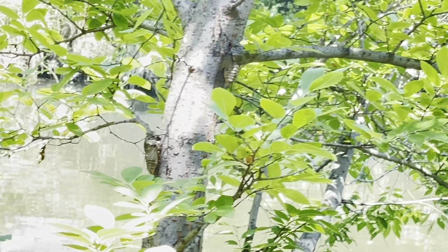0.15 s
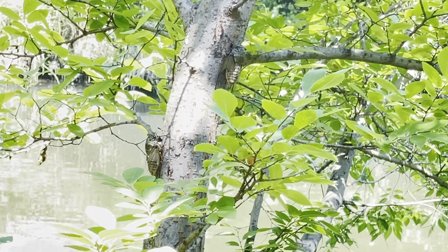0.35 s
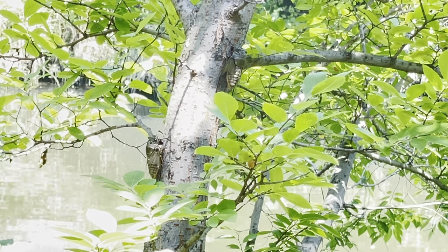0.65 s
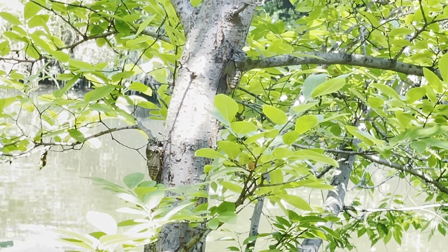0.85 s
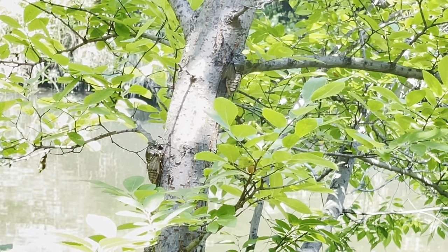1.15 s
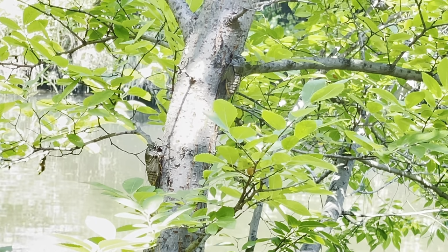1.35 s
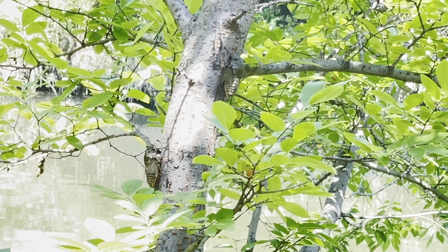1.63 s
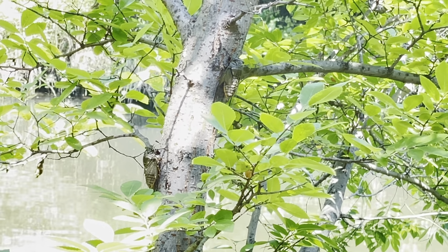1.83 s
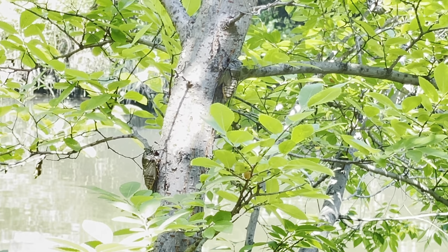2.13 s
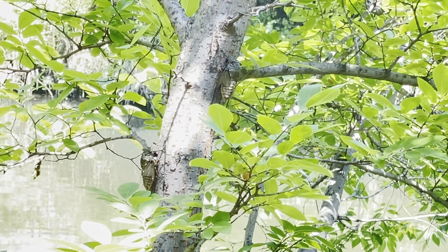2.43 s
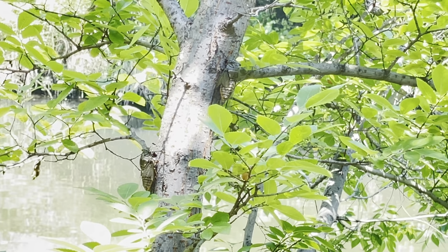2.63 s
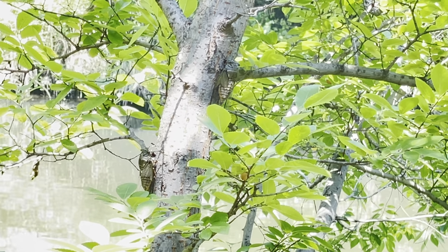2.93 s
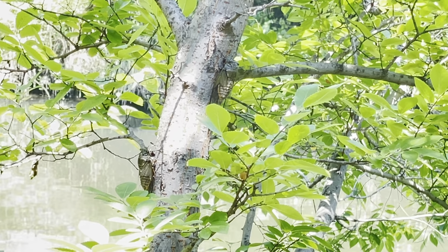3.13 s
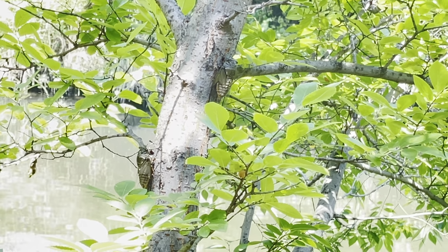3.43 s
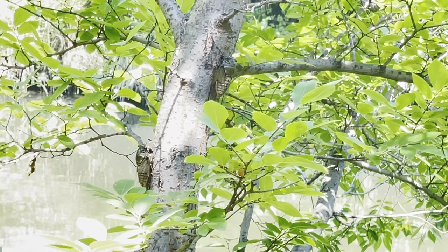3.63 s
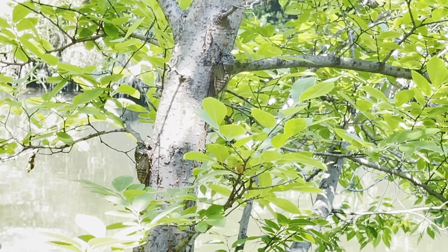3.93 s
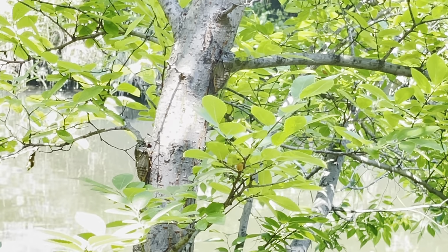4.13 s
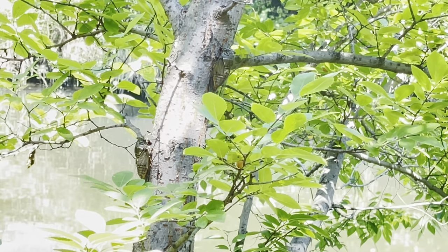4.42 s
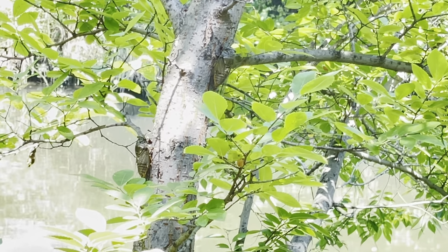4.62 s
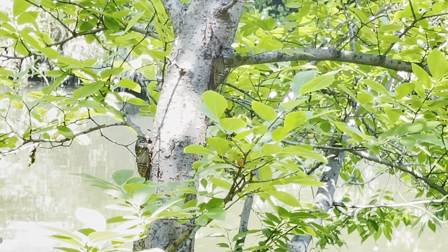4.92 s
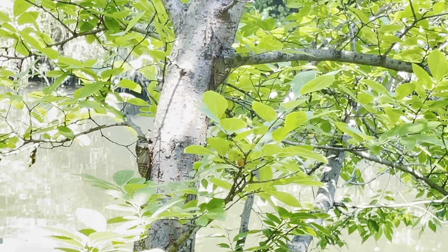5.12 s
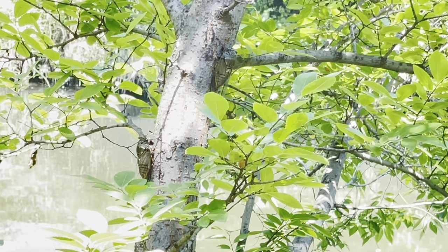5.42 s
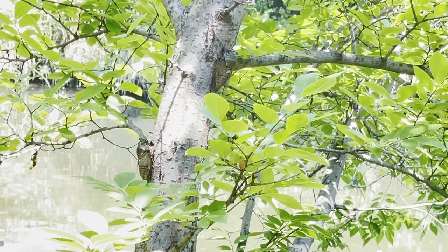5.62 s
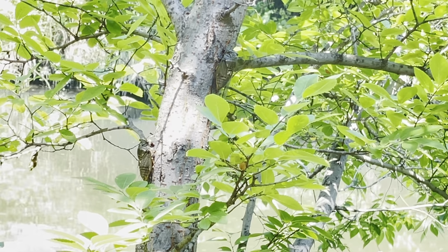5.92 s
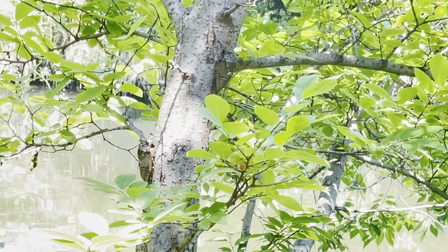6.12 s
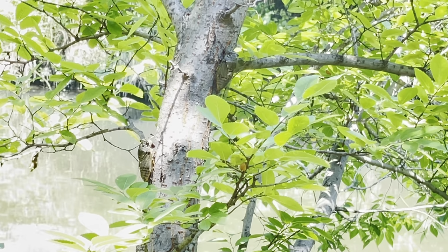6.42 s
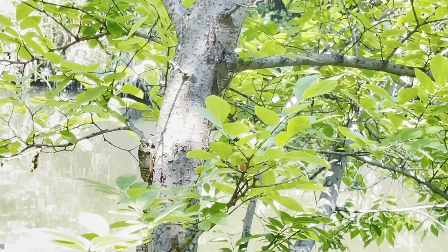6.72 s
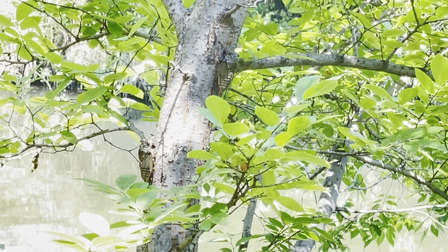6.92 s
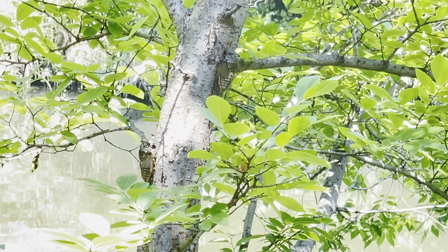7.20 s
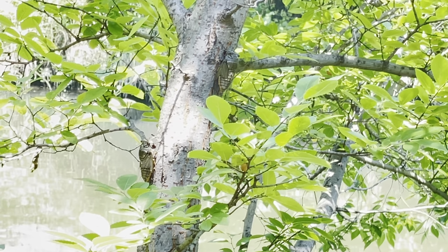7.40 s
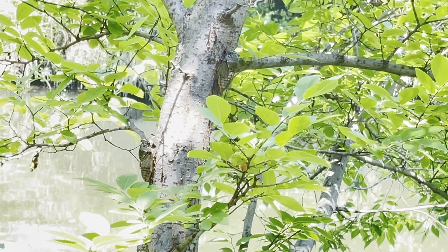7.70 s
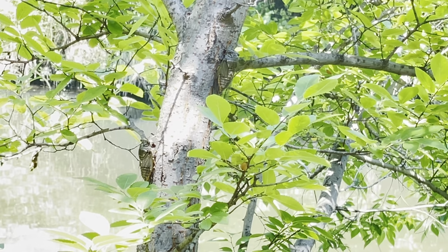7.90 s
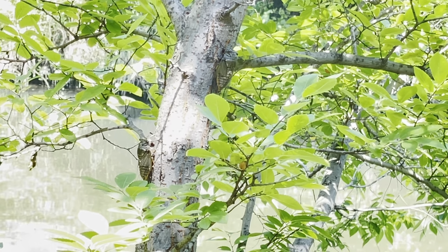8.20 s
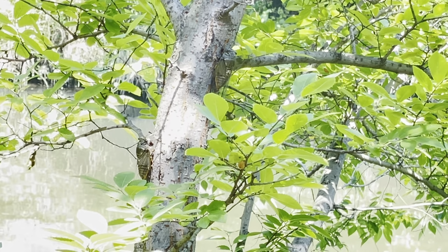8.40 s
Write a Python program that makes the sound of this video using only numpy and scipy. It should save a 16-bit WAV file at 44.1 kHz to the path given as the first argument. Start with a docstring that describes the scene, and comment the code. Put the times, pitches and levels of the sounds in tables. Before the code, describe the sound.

A cicada buzzes loudly and continuously on a nearby trunk, its harsh rapid rattle dulling midway, tightening again, then fading slightly over faint town rumble.

```python
"""A cicada buzzes on a tree trunk by a pond, close to a phone. Some 43 to 49 times a second a muscle stroke buckles
the ribs of its tymbals in a quick run of clicks that ring the hollow abdomen; midway the body slackens, then tenses again.
Leaves and branches scatter the song as noise tails and short echoes. Under it lie a town's rumble, made of filtered
noise, and, near the end, a distant engine gathering speed, made of wavering exhaust harmonics."""
import sys
import numpy as np
from scipy import signal
from scipy.fft import rfft, irfft, next_fast_len
from scipy.io import wavfile
from scipy.ndimage import uniform_filter1d

SR = 44100
rng = np.random.default_rng(int(sys.argv[2]) if len(sys.argv) > 2 else 0)


def digitize_waveform(pressure):
    """Quantize a signal to 16-bit integers and store it at the path in sys.argv[1].

    Rows of a 2-D input are taken as channels; values are limited to [-1, 1].
    """
    field = np.atleast_2d(pressure).T
    bounded = np.clip(field, -1, 1)
    quanta = np.round(bounded * 32767).astype(np.int16)
    wavfile.write(sys.argv[1], SR, quanta)


N = 377055

TIME = np.arange(N) / SR
# filters work on a padded length, so that their tails do not wrap round
PADDED = 2 * next_fast_len(N // 2 + 8192, real=True)
FREQ = np.maximum(np.fft.rfftfreq(PADDED, 1 / SR), 1)
TOP_HZ = 15500


def undb(db):
    """Decibels to gain."""
    return 10 ** (np.asarray(db) / 20)


def unit(x):
    """Scale to rms 1."""
    return x / np.sqrt(np.mean(x ** 2))


def across(table):
    """A (Hz, value) table at every frequency, joined on a log axis."""
    hz, value = np.transpose(table)
    return np.interp(np.log(FREQ), np.log(hz), value)


def filtered(x, response):
    """Pass a sound through a frequency response."""
    return irfft(rfft(x, PADDED) * response)[..., :N]


def walk(rate_hz):
    """Slow random drift with a spread near 1, heading for a new value rate_hz times a second."""
    points = rng.standard_normal(1024)
    return np.interp(TIME * rate_hz, np.arange(len(points)), points)


def smear(clicks, decay_s):
    """Noise that follows each click and dies away."""
    power = signal.lfilter([1], [1, -np.exp(-2 / (decay_s * SR))], clicks ** 2)
    return unit(np.sqrt(power) * rng.standard_normal(N))


def cicada(near_lead_s=.001, far_lead_s=.0014, far_share=.55, far_hz=6000):
    """Two tymbals drive the body, the far one mostly in the treble; returns the sound from the trunk and from all round."""
    stroke_hz = stroke_rate()
    tension, loud_db, treble_db, fill, hitch = posture()
    near = tymbal(stroke_hz, tension, fill, hitch, near_lead_s)
    far = tymbal(stroke_hz, tension, fill, hitch, far_lead_s)
    # share of the power that the far tymbal gives at each frequency
    share = far_share / (1 + (far_hz / FREQ) ** 6)
    drive = unit(filtered(near, np.sqrt(1 - share)) + filtered(far, np.sqrt(share)))
    return abdomen(leaves(drive), tension, treble_db) * undb(loud_db)


def stroke_rate(flag_hz=3.85, waver_hz=.15):
    """Strokes per second: the muscle starts each bout fresh, sags through it and flags at its end."""
    # bouts of the muscle: start_s, end_s, fresh_rate_hz (before sag and flagging), sag_hz_per_s, flag_time_s
    bouts = np.array([(0, 3.8, 47.96, .1, 1.08), (3.8, 8.55, 49.19, .53, .92)])
    start_s, end_s, fresh_hz, sag, flag_s = bouts[np.searchsorted(bouts[1:, 0], TIME)].T
    flagging = flag_hz * np.exp((TIME - end_s) / flag_s)
    return fresh_hz - sag * (TIME - start_s) - flagging + waver_hz * walk(14)


def posture(shift_s=.3, tiring_db_per_s=.3836, fade_at_s=8.2, fade_db_per_s=5,
            swing_hz=1.92, swing_db=6, steady_at_s=2.7):
    """Tension, loudness, treble, fill and hitch: each posture eases into the next while the song slowly tires."""
    # postures the abdomen takes and holds: start_s, tension (0-1), level_db (before tiring and fade),
    # treble_db, fill (even click size that fills in the throb, before its swing), hitch in mid-stroke (0-1)
    postures = np.array([(0, 1, -23, -.3, 1.7, 0.1), (2.7, 1, -22.5, -0.5, 1.3, 0),
                         (3.7, 0.8, -24, -1, 2.4, 0), (4.22, 0, -26, -1, 1.5, 0.7),
                         (5.2, 0.01, -25.5, 0, 1.1, 0.55), (6.7, 0.94, -22, -1.6, 0.97, 0.2),
                         (7.549, 0.96, -23.5, -3.5, 0.18, 0.1), (8.02, 0.86, -23.5, -3.5, 0.86, 0.2),
                         (8.35, .75, -24.4, -3.5, 0.36, 0.9)])
    held = postures[np.searchsorted(postures[1:, 0], TIME)].T
    _, tension, level_db, treble_db, fill, hitch = uniform_filter1d(held, int(shift_s * SR), mode="nearest")
    tiring_db = tiring_db_per_s * TIME
    fade_db = fade_db_per_s * np.maximum(TIME - fade_at_s, 0)
    # early in the song the throb comes and goes
    fill_swing_db = swing_db * np.sin(2 * np.pi * swing_hz * TIME) * (TIME < steady_at_s)
    return tension, level_db - tiring_db - fade_db, treble_db, fill * undb(fill_swing_db), hitch


def tymbal(stroke_hz, tension, fill, hitch, lead_s, spread_s=.0023, crackle_s=.0006, crackle_db=-8):
    """Bending waves carry the treble of a click out first, drawing it into a chirp; the membrane crackles after it."""
    clicks = rib_clicks(stroke_hz, tension, fill, hitch, lead_s)
    drive = unit(clicks) + undb(crackle_db) * smear(clicks, crackle_s)
    delay_s = spread_s * (.5 - FREQ / TOP_HZ)
    # phase is the running sum of delay over frequency
    chirp = np.exp(-2j * np.pi * np.cumsum(delay_s) * SR / PADDED)
    return unit(filtered(drive, chirp))


def rib_clicks(stroke_hz, tension, fill, hitch, lead_s, count=17, first_stroke=.31,
               tense_share=.059, slack_share=.053, offset_s=.00009, jitter_s=.00005, slip_s=.00011,
               build_db=5.6, pull_ribs=6.4, volleys_per_stroke=6, volley_depth=.5, hitch_ribs=1.9,
               uneven_db=1.3, chance_db=.5):
    """Each stroke buckles uneven ribs and stops short; slack ribs go in volleys, and a hitch splits the stroke."""
    # first_stroke: the part of it that is already over at the start
    turns = first_stroke + np.cumsum(stroke_hz) / SR
    stroke = np.arange(1, int(turns[-1]) + 2)[:, None]
    late, strong = rib_habits(len(stroke), count)
    chance = rng.standard_normal((len(stroke), 3, count))
    firm, even, split = (np.interp(stroke, turns, control) for control in (tension, fill, hitch))

    # place of each rib, as a share of a stroke from its middle
    rib = np.arange(count) - (count - 1) / 2
    place = rib * (slack_share + (tense_share - slack_share) * firm)
    when = np.interp(stroke + place, turns, TIME, left=-1, right=TIME[-1] + 1)
    # a whole stroke slips in time; each rib is late by habit and by chance
    when = when + slip_s * chance[:, 0, :1] + offset_s * late + jitter_s * chance[:, 1]

    # the clicks build up through the pull (build_db per stroke) and stop quickly when the muscle lets go
    arch = undb(build_db * place) * np.exp(-np.abs(rib / pull_ribs) ** 5)
    volleys = 1 - volley_depth * (1 - firm) * np.cos(2 * np.pi * volleys_per_stroke * place)
    halves = 1 - split * np.exp(-(rib / hitch_ribs) ** 4)
    size = unit(arch) * volleys * halves + even
    size = size * undb(uneven_db * strong + chance_db * chance[:, 2])
    # every stroke spends the same energy
    size = size / np.linalg.norm(size, axis=1, keepdims=True)

    sample = np.floor((when - lead_s) * SR).astype(int)
    inside = (sample >= 0) & (sample < N)
    return np.bincount(sample[inside], size[inside], N)


def rib_habits(strokes, ribs, memory_strokes=14):
    """How late and how strongly each rib buckles: no two are alike, and the pattern changes slowly over the strokes."""
    chance = rng.standard_normal((strokes, ribs, 2))
    habits = unit(uniform_filter1d(chance, memory_strokes, axis=0, mode="wrap"))
    return np.moveaxis(habits, -1, 0)


def abdomen(drive, tension, treble_db, treble_hz=8500, tires_from_s=1.2, tired_at_s=7.4):
    """The hollow body rings in its present posture; tense, it passes from fresh to lower, tired resonances."""
    # broad colour of the tense and of the slack body: pitch_hz, level_db
    tense_colour = [(1500, -49), (2050, -38), (2700, -24.5), (3020, -15.3), (3300, -6), (3900, -3),
                    (4700, -.5), (6000, 0.9), (7100, -0.16), (7550, -1), (8300, -6.5), (9300, -6),
                    (9900, -5.5), (12200, -8), (13200, -16), (14200, -24), (15500, -40)]
    slack_colour = [(1500, -52), (2100, -46), (2700, -29.5), (3000, -19.5), (3300, -12), (3900, -7.5),
                    (4700, -7.5), (6000, -4), (7100, -2.5), (7550, -5), (8300, -11), (9300, -10),
                    (10200, -10.5), (12200, -14.5), (13200, -18), (14200, -26), (15500, -41)]
    # resonances that stand out of it, for the fresh tense, tired tense and slack body: pitch_hz, width_hz, lift_db
    fresh_modes = [(2460, 70, 2), (3520, 290, 6.8), (4365, 180, 7.6), (4850, 300, 2.8), (5400, 80, 5),
                   (5545, 110, 5.2), (6250, 110, 2.2), (6580, 70, 3.2), (6910, 80, 3), (7900, 300, 3.3),
                   (9050, 150, 2), (12150, 130, 3.4)]
    tired_modes = [(2250, 130, 5.5), (2470, 110, 8), (2850, 200, 4.8), (3330, 380, 5.5), (3680, 200, 2.2),
                   (4290, 220, 6.6), (4860, 200, 2.5), (5400, 100, 4), (5520, 120, 3.5), (6220, 130, 2.2),
                   (6920, 90, 2.5), (7250, 120, 2), (10950, 500, 2.2), (13700, 900, 3.5)]
    slack_modes = [(3550, 290, 5.6), (4540, 300, 5.2), (4830, 280, 6.7), (5150, 60, 4.8), (5400, 260, 5.4),
                   (5860, 140, 5.8), (6620, 130, 4.4), (6910, 70, 3), (7950, 300, 3.2), (9050, 200, 3),
                   (11120, 330, 4.9), (11600, 110, 4), (12150, 220, 5.4), (12660, 200, 5.8)]
    fresh = unit(filtered(drive, ringing(tense_colour, fresh_modes)))
    tired = unit(filtered(drive, ringing(tense_colour, tired_modes)))
    slack = unit(filtered(drive, ringing(slack_colour, slack_modes)))
    tiredness = np.interp(TIME, [tires_from_s, tired_at_s], [0, 1])
    tense = fresh + (tired - fresh) * tiredness
    song = tension * tense + (1 - tension) * slack
    treble = filtered(song, .5 + .5 * np.tanh((FREQ - treble_hz) / 1000))
    return song + (undb(treble_db) - 1) * treble


def ringing(colour, modes):
    """Causal (minimum-phase) response of a body with a broad colour and a few resonances."""
    db = across(colour)
    for hz, width_hz, lift_db in modes:
        db = db + lift_db / (1 + (2 * (FREQ - hz) / width_hz) ** 2)
    # folding the cepstrum onto positive time makes the ringing follow the click
    cepstrum = irfft(np.log(undb(db)))
    return np.exp(rfft(2 * cepstrum[:PADDED // 2], PADDED) - cepstrum[0])


def leaves(drive, decay_s=.075, scatter_hz=8000, most=.53, around_db=-14.3):
    """Moving leaves scatter the song into noise tails, the more so the shorter the wave; returns front and around."""
    scattered = most * FREQ ** 4 / (FREQ ** 4 + scatter_hz ** 4)
    direct = filtered(drive, np.sqrt(1 - scattered))
    front = direct + filtered(smear(drive, decay_s), np.sqrt(scattered))
    around = undb(around_db) * filtered(smear(drive, decay_s), np.sqrt(.5 + 2 * scattered))
    return np.array([front, around])


def trees(x, t60_s=.26, first_s=.000685):
    """Short fixed echoes from the trunk and the nearest branches: a decaying burst of noise as impulse response."""
    t = TIME[:SR // 4]
    # a fall of 60 dB in t60_s
    decay = np.exp(-np.log(1000) * t / t60_s)
    echoes = rng.standard_normal(len(t)) * decay * (t > first_s)
    return signal.fftconvolve(x, echoes / np.linalg.norm(echoes))[:N]


def engine(cruise_hz=40.8, fast_hz=45.9, speed_up_at_s=7.62, speed_up_s=.4,
           scatter=.35, fading_hz=9, waver=.004):
    """Far exhaust tones that climb once in pitch; each comes by several paths through the trees, so its level wavers."""
    # exhaust tones: multiple of the firing rate, level_db (relative)
    exhaust = [(2, -7), (3, -13), (4, -12), (5, -8), (6, 0), (7, -3.5), (8, -14), (9, -20)]
    # it comes into earshot, sinks briefly and returns: time_s, level_db
    engine_pass = [(0, -110), (6.4, -70), (7.0, -60), (7.25, -52), (7.5, -50), (7.77, -48.3), (7.88, -52.5),
                   (8.05, -53.5), (8.35, -51), (8.55, -52.5)]
    climb = .5 + .5 * np.tanh((TIME - speed_up_at_s) / speed_up_s)
    firing_hz = cruise_hz + (fast_hz - cruise_hz) * climb
    angle = 2 * np.pi * np.cumsum(firing_hz * (1 + waver * walk(20))) / SR
    tones = 0
    for multiple, level_db in exhaust:
        # strength and phase of the tone, drifting by chance
        paths = 1 + scatter * (walk(fading_hz) + 1j * walk(fading_hz))
        tones = tones + undb(level_db) * np.imag(paths * np.exp(1j * multiple * angle))
    return unit(tones) * undb(np.interp(TIME, *np.transpose(engine_pass)))


def town(level_db=-49, side_db=-8.7, left_db=.55, wide_hz=200, narrow_hz=1100, rise_db=2.5):
    """Low rumble of filtered noise that slowly grows; its bass is nearly alike at both ports."""
    # colour of the rumble: pitch_hz, level_db (relative, per Hz)
    rumble = [(12, -53), (20, -26), (33, -6.5), (47, 1), (70, -3.5), (93, 0.5), (104, -7.5), (119, -7),
              (130, -12), (160, -11), (212, -14.5), (270, -14.5), (381, -19.5), (594, -21.5), (707, -23.5),
              (1080, -27), (2000, -29.5), (2600, -25), (4400, -120)]
    mid, side = filtered(rng.standard_normal((2, N)), undb(across(rumble)))
    # the side noise is band-limited: it fades in above wide_hz and rolls off past narrow_hz
    side_band = FREQ / np.hypot(FREQ, wide_hz) / np.hypot(1, (FREQ / narrow_hz) ** 2)
    side = filtered(side, undb(side_db) * side_band)
    pair = unit(np.array([(mid + side) * undb(left_db), (mid - side) * undb(-left_db)]))
    swell_db = .4 * walk(4)
    growth_db = rise_db * (TIME / TIME[-1] - .5)
    return pair * undb(level_db + swell_db + growth_db)


def scene(song_db=-2.5, echo_db=-17):
    """The song reaches the two ports at different phases; the town and the engine lie under it."""
    # how far the left port leads the right for the song: pitch_hz, lead_radians
    port_phase = [(20, 0), (3020, 0), (3170, .62), (5330, .62), (5500, -.7), (5750, -1.6), (6600, -.78),
                  (7200, -1.3), (7450, -2.3), (8080, -2.2), (8320, -3.05), (9250, -3.25), (10000, -4.05),
                  (12300, -5.4), (13000, -2 * np.pi)]
    front, around = undb(song_db) * cicada()
    front = front + undb(echo_db) * trees(front)
    # the sound from all round has opposite signs at the two ports
    song = np.array([front + around, front - around])
    lead = np.exp(1j * across(port_phase) * np.array([[1], [0]]))
    return filtered(song, lead) + engine() + town()


def record(dry, low_hz=28):
    """The phone cuts the deepest bass and the top."""
    thinned = signal.sosfilt(signal.butter(3, low_hz, "high", fs=SR, output="sos"), dry)
    return signal.sosfilt(signal.ellip(8, .2, 70, TOP_HZ, fs=SR, output="sos"), thinned)


dry = scene()
out = record(dry)
digitize_waveform(out)
```